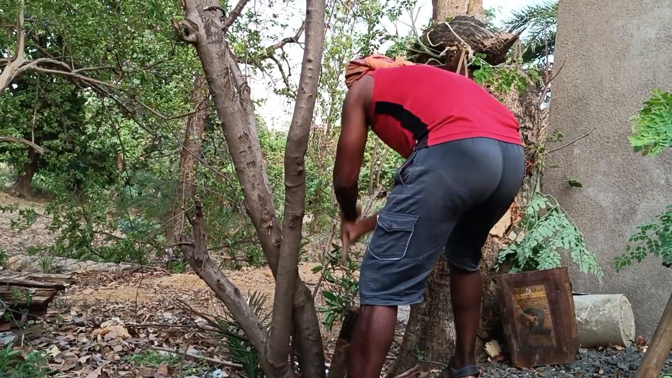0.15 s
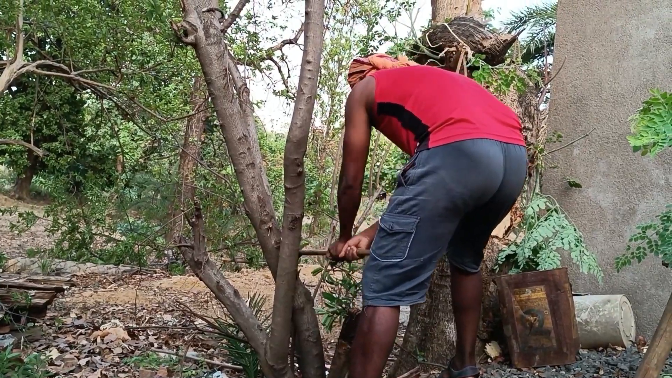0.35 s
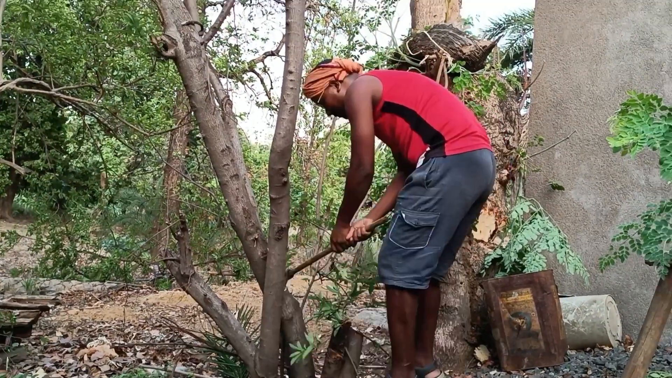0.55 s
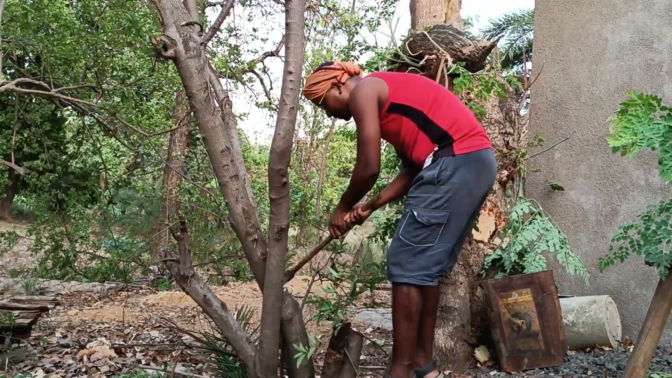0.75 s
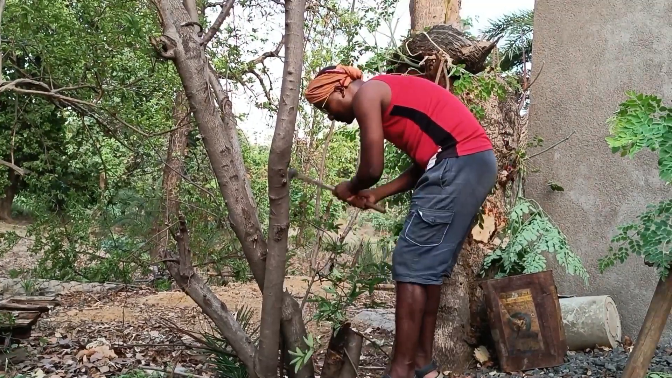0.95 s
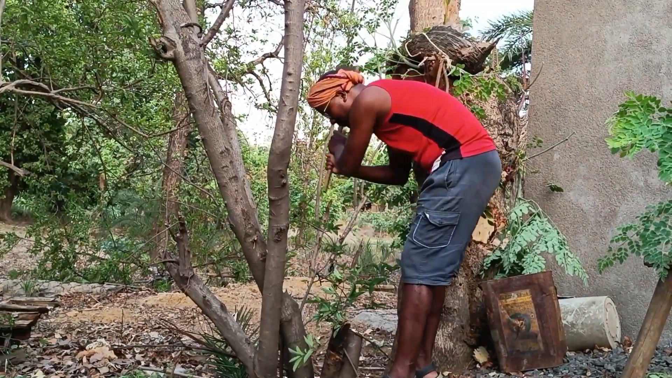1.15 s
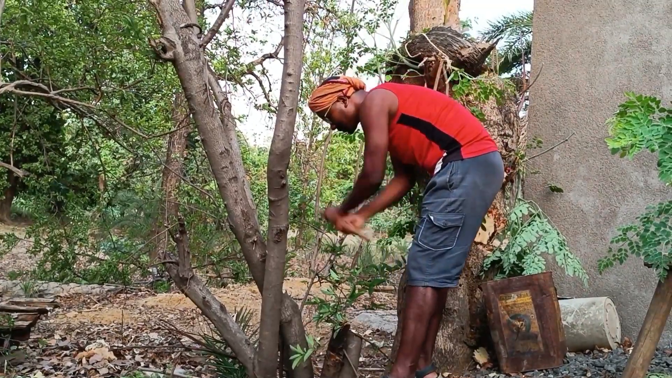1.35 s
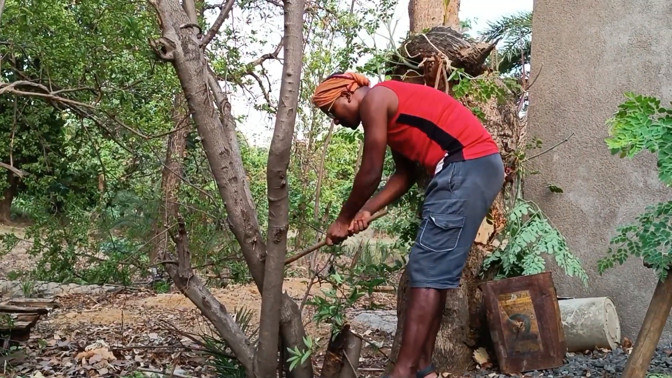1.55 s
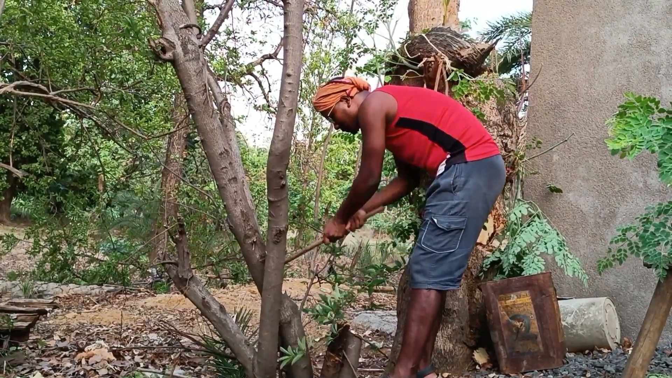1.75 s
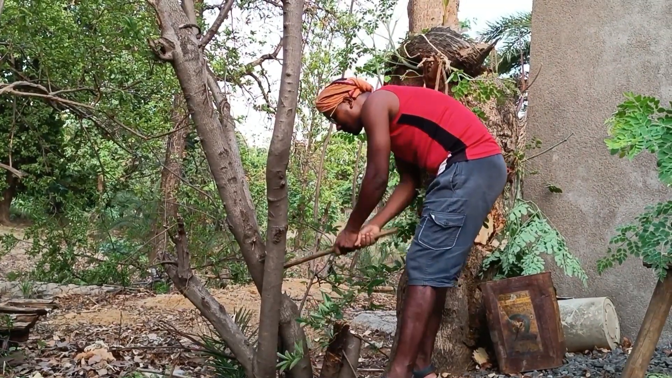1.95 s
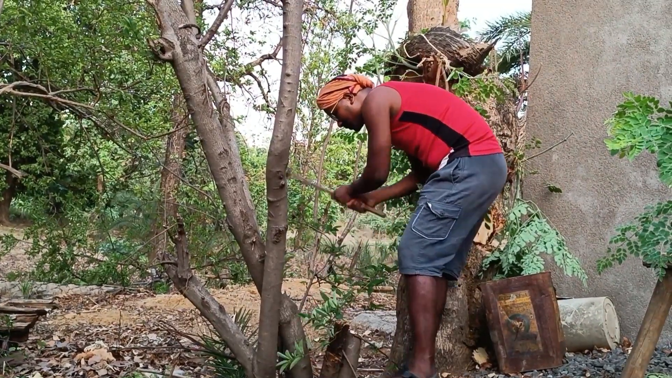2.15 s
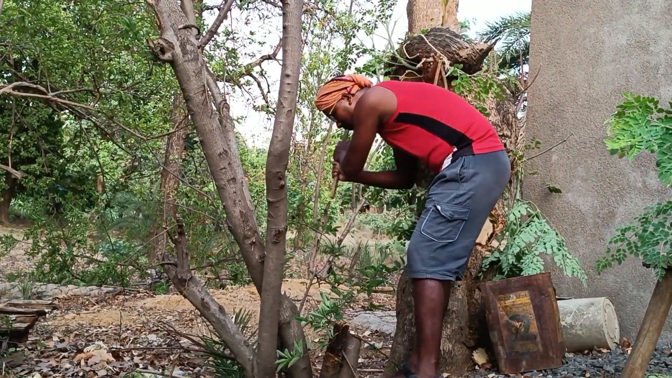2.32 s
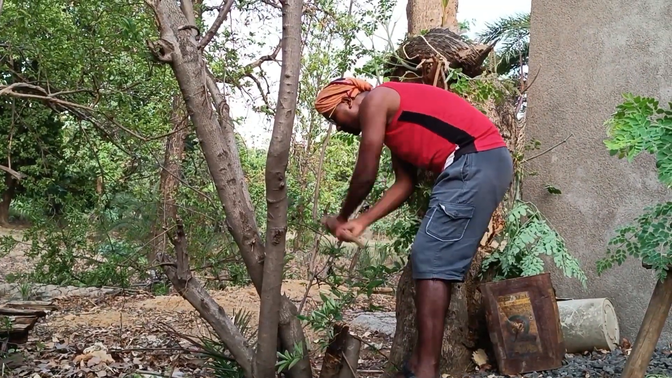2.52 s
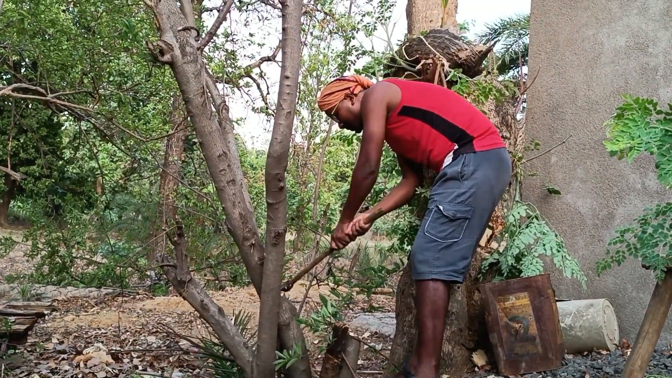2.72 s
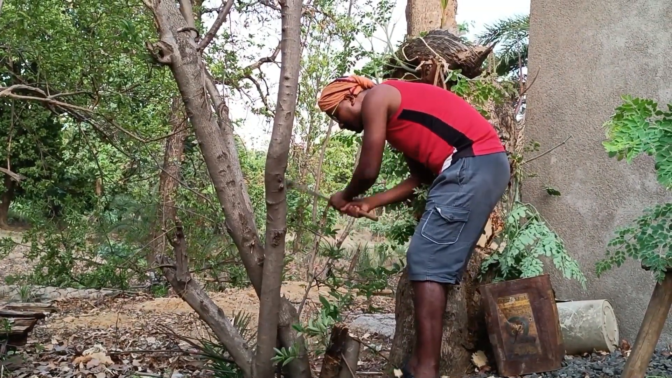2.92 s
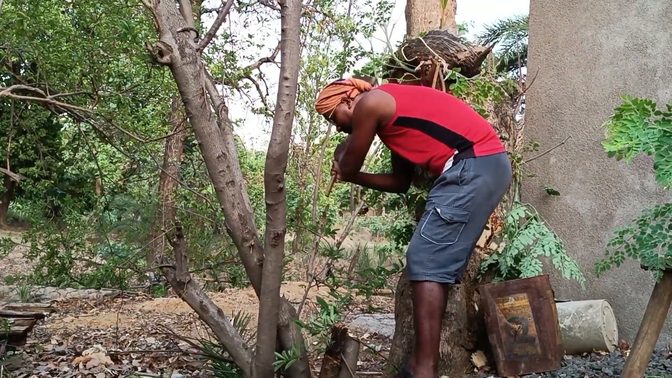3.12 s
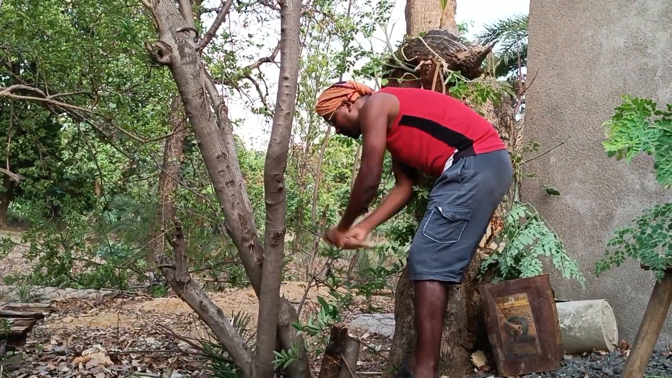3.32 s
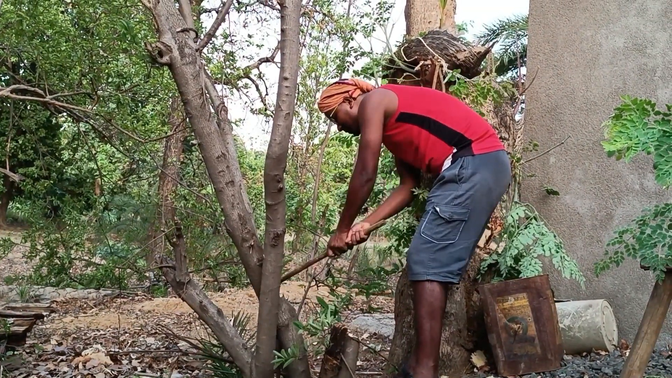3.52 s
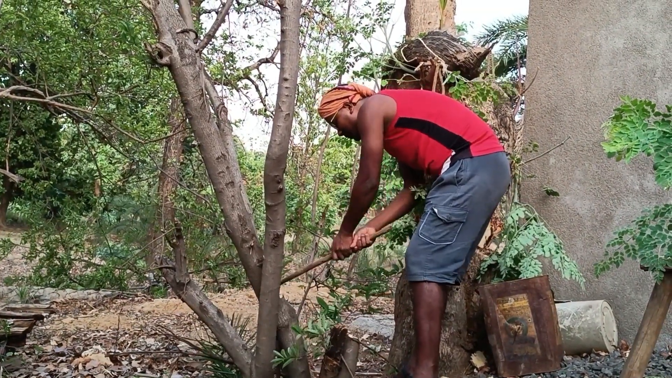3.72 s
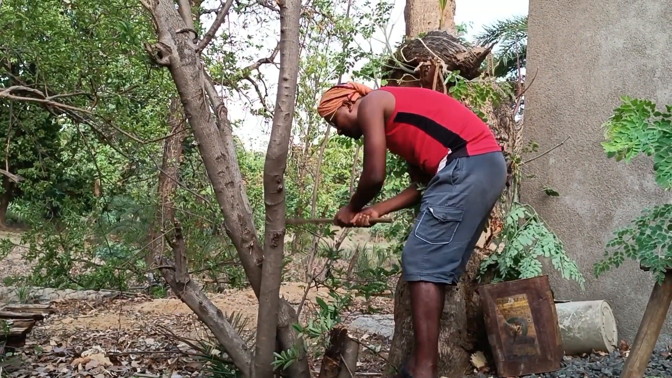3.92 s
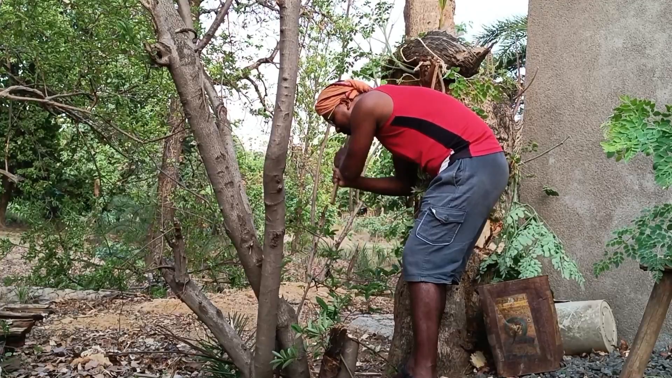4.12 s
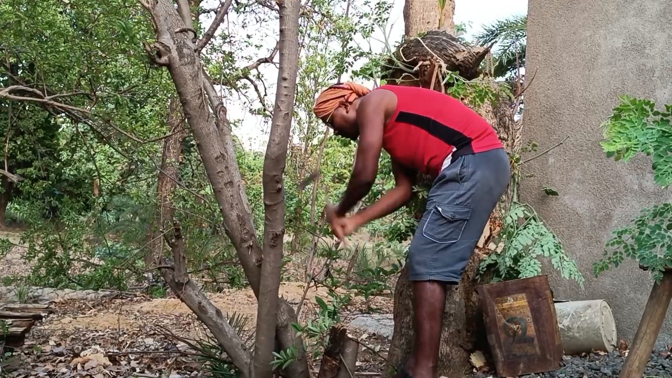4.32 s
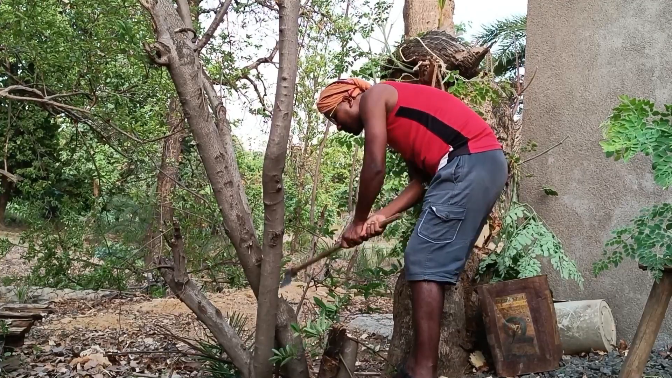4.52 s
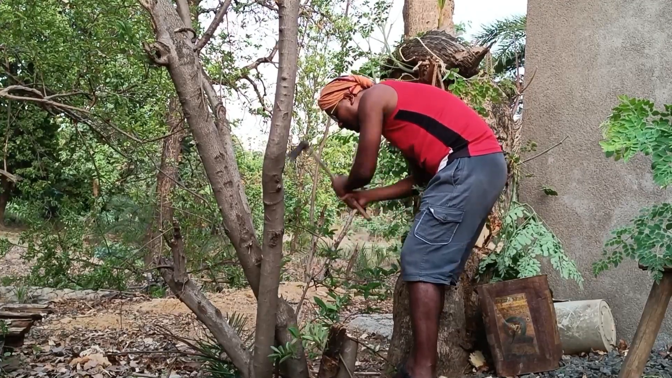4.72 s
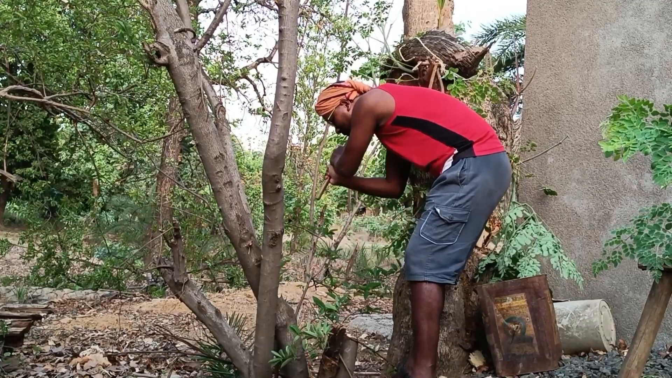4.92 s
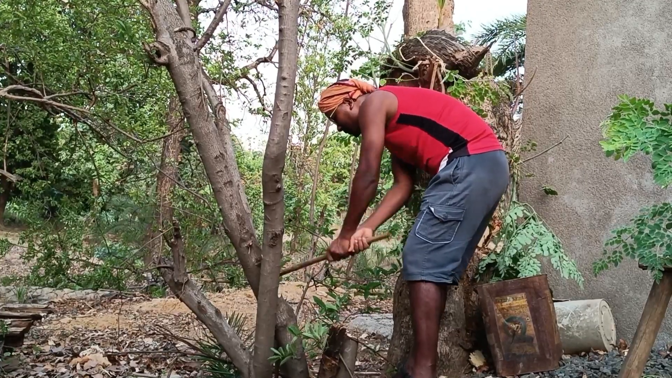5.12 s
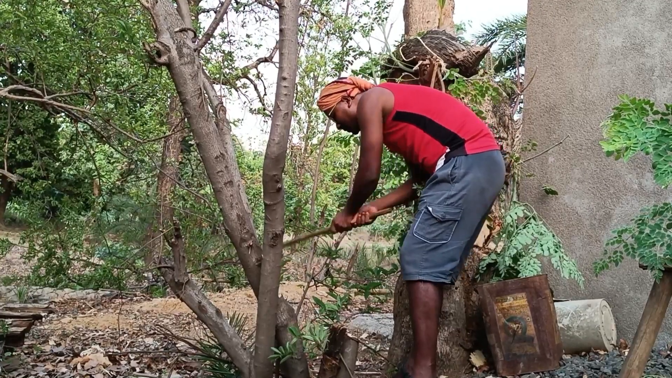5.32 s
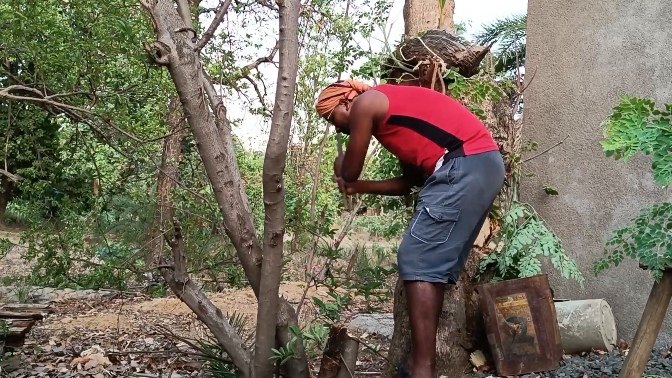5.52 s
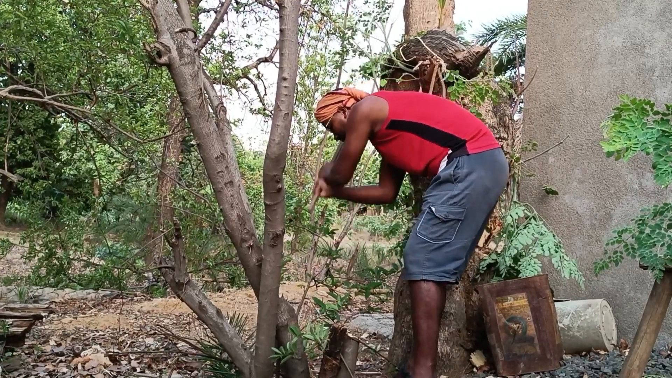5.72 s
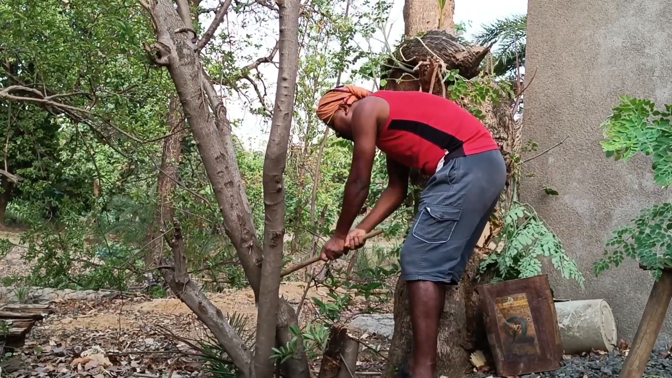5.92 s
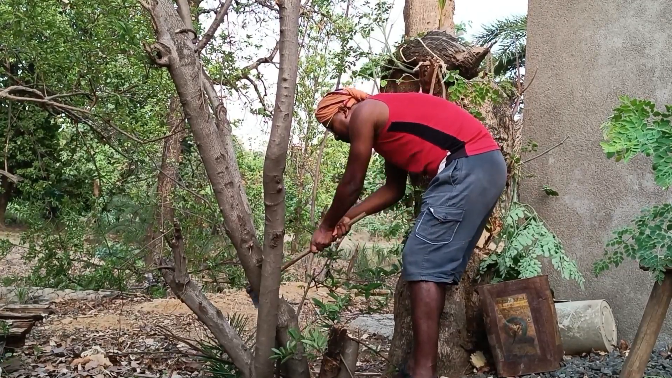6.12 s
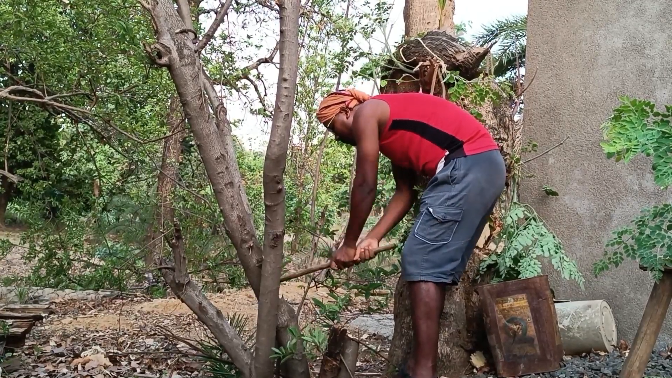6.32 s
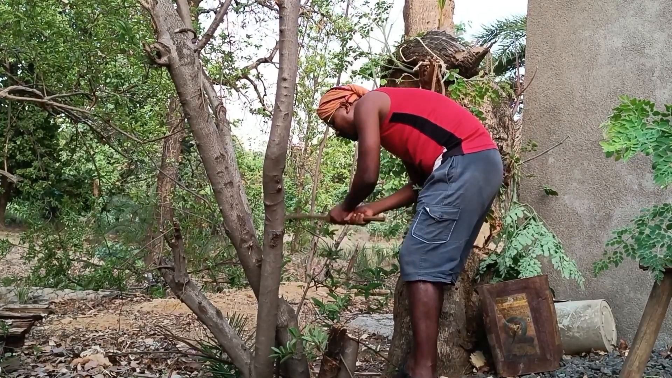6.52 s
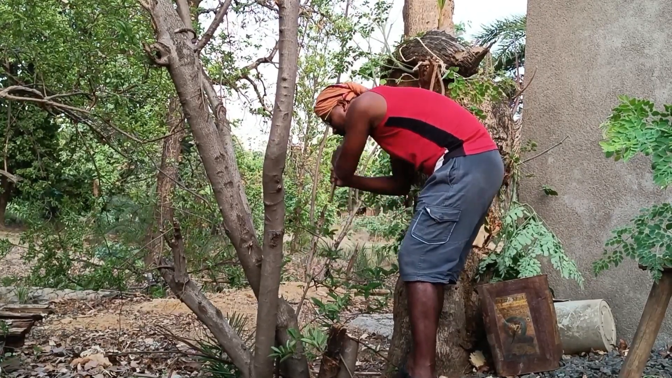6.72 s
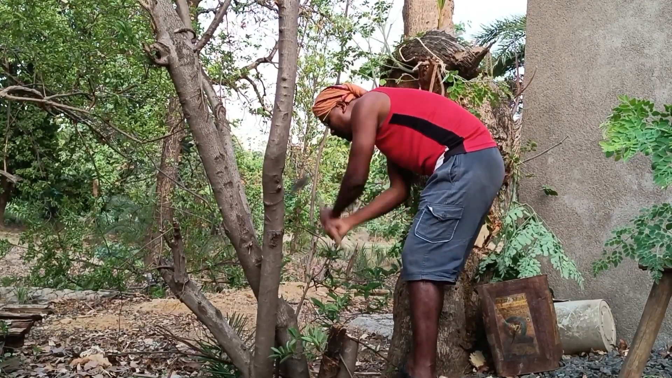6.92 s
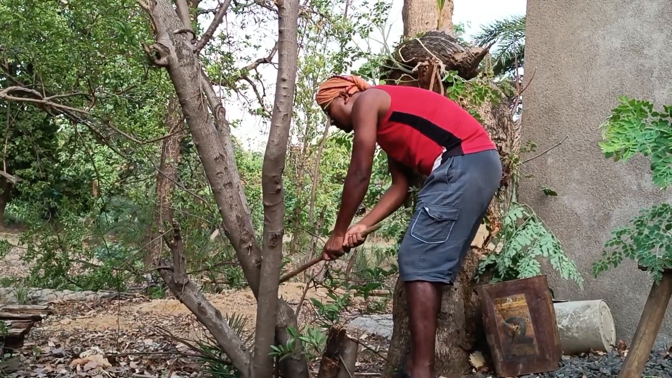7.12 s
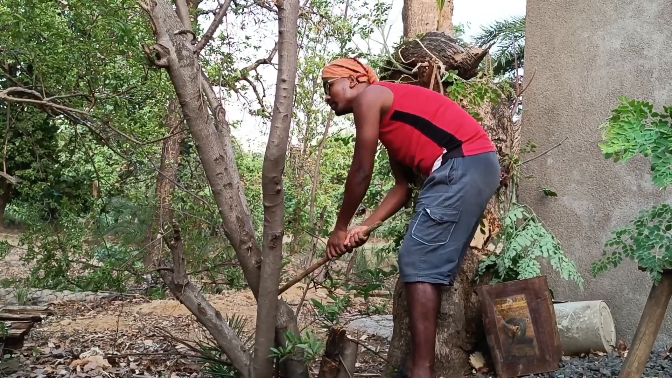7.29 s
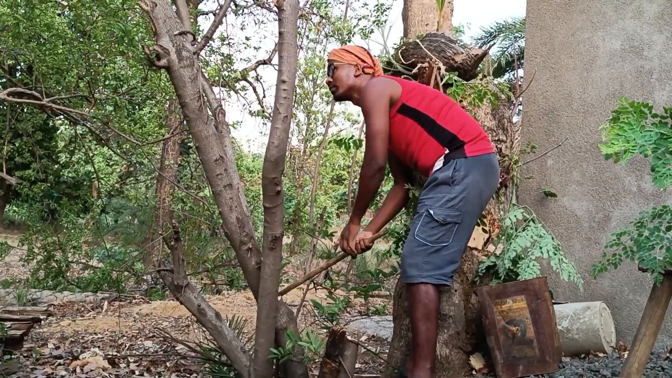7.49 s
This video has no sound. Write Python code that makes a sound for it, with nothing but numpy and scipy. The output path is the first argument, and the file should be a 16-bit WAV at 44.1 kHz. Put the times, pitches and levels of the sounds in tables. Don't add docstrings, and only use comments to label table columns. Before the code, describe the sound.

In a yard beside a house wall, an axe bites a thin trunk eight times, roughly once a second. Each blow is a sharp fibrous crack with a hollow low thump, a short slap off the wall and a shiver of leaves just after. Between blows, leaves rustle, twigs tick and chips knock. Faint high cicada buzz, far birds and traffic hum continue. Close stereo microphone, peaks slightly rounded.

```python
import sys
import numpy as np
from scipy import signal
from scipy.fft import rfft, irfft
from scipy.io import wavfile

SR = 44100
rng = np.random.default_rng(int(sys.argv[2]) if len(sys.argv) > 2 else 0)


def store_pcm(level_fs):
    pcm = np.round(np.clip(level_fs, -1, 1) * 32767).astype(np.int16)
    wavfile.write(sys.argv[1], SR, np.atleast_2d(pcm).T)


def undo_db(level):
    steps = np.asarray(level, float) / 20
    return 10 ** steps


N = 332955
T = np.arange(N) / SR

# start in s, bite length in s, pitch of the crack in Hz, final snap in dB.
BLOWS = [
    (0.387, .014, 3056, 7),
    (1.564, .013, 3060, 10.5),
    (2.7302, .0099, 2916, 17.5),
    (3.5180, .0052, 2750, 19),
    (4.5431, .0064, 2833, 9.5),
    (5.2555, .011, 3146, 11.5),
    (6.0066, .009, 2896, 14.5),
    (7.1465, 0.011, 2797, 16),
]
# thud in dB, crack in dB, splinters in dB, yard echo in dB.
BITES = [
    (-20, -17.5, -30, -8.5),
    (-20.5, -19, -23.5, -11),
    (-17, -21, -28, -9.5),
    (-17, -7, -29, -17.5),
    (-17, -15, -18, -13.5),
    (-17.5, -15.5, -21, -10.5),
    (-17.5, -23, -27.5, -12),
    (-14.5, -20, -30.5, -11),
]
# multiple of the crack pitch, width in Hz.
CRUNCH = [(.32, 445), (.61, 589), (1, 1080), (2.6, 13900)]
# trunk sway in dB, fork in dB, handle in dB, crown in dB, crown t60 in s.
SWINGS = [
    (-20.5, -18, -27, -48.5, 0.7),
    (-22.5, -14, -27.5, -41.5, 0.41),
    (-27.5, -10, -24.5, -41.5, 0.55),
    (-21.5, -14, -17, -43.5, 0.7),
    (-20.5, -17, -26.5, -38.5, 0.42),
    (-23, -31.5, -19, -43.5, .46),
    (-16, -31.5, -25.5, -41, 0.46),
    (-19.5, -16, -19.5, -41.5, 0.54),
]


def rms_one(x):
    return x / np.sqrt(np.mean(x ** 2) + 1e-20)


def at_hz(points, hz):
    table = np.array(points)
    return np.interp(np.log(hz), np.log(table[:, 0]), table[:, 1])


def drift(rate):
    r = np.exp(-80 * np.pi * rate / SR)
    white = rng.standard_normal(N // 40 + 2002)
    slow = signal.lfilter([1], [1, -2 * r, r * r], white)[2000:]
    return np.interp(np.arange(N) / 40, np.arange(len(slow)), rms_one(slow))


def ring(x, hz, t60):
    r = undo_db(-60 / (t60 * SR))
    w = 2 * np.pi * hz / SR
    return signal.lfilter([0, np.sin(w)], [1, -2 * r * np.cos(w), r * r], x + 1e-18)


def resonate(x, hz, width_hz):
    r = np.exp(-np.pi * width_hz / SR)
    zeros = np.array([1, 0, -1]) * (1 - r * r) / 2
    poles = [1, -2 * r * np.cos(2 * np.pi * hz / SR), r * r]
    return signal.lfilter(zeros, poles, x + 1e-18)


def grains(per_s, spread_db, size):
    heights = undo_db(spread_db * np.minimum(rng.exponential(1, size), 5))
    signed = heights * rng.choice([-1, 1], size)
    return rms_one(signed * (rng.random(size) < per_s / SR))


def bands(white, gain, lowest_hz):
    # frequency in Hz, likeness of left and right from -1 to 1.
    likeness = [(60, 0.86), (180, 0.69), (550, 0.36), (1650, 0.0033), (4970, -0.027), (15000, -0.14)]
    out = 0
    edges = 18000 / 2 ** np.arange(0, np.log2(18000 / lowest_hz), .5)
    for k, (high, low) in enumerate(zip(edges, edges[1:])):
        band = signal.butter(2, [low, high], "band", fs=SR, output="sos")
        mid, side = signal.sosfilt(band, white[k % 2])
        hz = np.sqrt(low * high)
        alike = np.clip(at_hz(likeness, hz), -1, 1)
        out = out + gain(hz) * (np.sqrt(1 + alike) * mid + np.sqrt(1 - alike) * side * [[1], [-1]])
    return out


def struck(times, db):
    clicks = np.zeros(N)
    clicks[(np.array(times) * SR).astype(int)] = undo_db(db)
    return clicks


def bite_colours():
    thud_db, crack_db, splinter_db, _ = np.transpose(BITES)
    blade_db = -23.5 + 2.1 * np.maximum(crack_db + 12.5, 0)
    return np.transpose([thud_db, blade_db, crack_db, splinter_db])


def yard():
    # frequency in Hz, level in dB per Hz.
    floor = [(18, -40), (30, -8), (111, 1.5), (178, -6.5), (316, -6), (493, -15), (1520, -16.5),
             (2430, -10.5), (4220, -22), (4930, -10.5), (6410, -26.5), (7300, -16.5), (8770, -22.5),
             (10300, -32), (15600, -20)]
    # frequency in Hz, level in dB per Hz.
    echo = [(35, -40), (60, -16), (230, -4), (460, -8.5), (900, -12.5), (1700, -9), (3200, -11),
            (4500, -12.5), (15500, -22.5)]
    # frequency in Hz, t60 in s.
    echo_t60 = [(60, 0.76), (250, 0.35), (700, 0.22), (2000, 0.19), (3500, 0.1), (6000, .1), (15000, 0.12)]
    white = rng.standard_normal((2, 2, N))
    together = drift(1.5)
    starts = np.array(BLOWS)[:, 0]
    multiples = np.array(CRUNCH)[:, 0]
    colours = bite_colours()

    def gain(hz):
        echo_db = []
        for (_, _, crack_hz, _), (*_, yard_db), colour_db in zip(BLOWS, BITES, colours):
            echo_db.append(yard_db + 0.68 * np.interp(hz / crack_hz, multiples, colour_db))
        decay = undo_db(-60 / (at_hz(echo_t60, hz) * SR))
        dying = signal.lfilter([1], [1, -decay], struck(starts, echo_db) + 1e-18)
        rising = signal.lfilter([.004], [1, -.996], dying)
        air = undo_db(-42.5 + at_hz(floor, hz) + 1.5 * together + 2 * drift(6.2))
        return np.hypot(air, undo_db(20.0 + at_hz(echo, hz) + 2 * drift(58)) * rising)
    return bands(white, gain, 30)


def cicada():
    # frequency in Hz, width in Hz, level in dB.
    tymbal = [(5100, 720, -9), (7300, 540, -8), (7650, 120, -1), (8150, 51, -2.5), (8686, 310, -6)]
    beat_rates = [209.3, 215.0]
    drive = .9 * rng.standard_normal((2, N))
    for pulse_hz in beat_rates:
        cycles = np.cumsum(pulse_hz * (1 + .001 * drift(1.5)) / SR)
        beats = np.diff(np.floor(cycles), prepend=0)
        rattle = grains(2700, 1.7, round(SR / pulse_hz))
        uneven_beats = beats * undo_db(1.5 * rng.standard_normal(N))
        steady = signal.fftconvolve(uneven_beats, rattle)[:N]
        drive += .7 * rms_one(steady) * undo_db(3 * drift(2.5))
    buzz = 0
    for k, (hz, width, db) in enumerate(tymbal):
        buzz = buzz + (-1) ** k * undo_db(db) * resonate(resonate(drive, hz, width), hz, width)
    return rms_one(buzz) * undo_db(-60.5 + 1.4 * drift(44)) * undo_db([[-4.0], [0]])


def birds():
    # start in s, length in s, start pitch in Hz, end pitch in Hz, level in dB.
    whistles = [(.178, .082, 1006, 1026, -71), (.275, .1, 880, 940, -75), (1.085, .06, 2380, 2390, -63.5),
                (1.145, .02, 2780, 2820, -73), (1.2, .035, 2440, 2660, -66), (1.236, .05, 2450, 2780, -65),
                (1.288, .038, 2460, 2320, -64), (1.34, .07, 2100, 2070, -70), (1.422, .03, 2440, 2340, -66),
                (1.432, .079, 1600, 1650, -69), (1.47, .06, 2330, 2450, -69), (3.715, .06, 1130, 1150, -55),
                (6.6, .03, 2150, 2170, -65), (6.79, .05, 2200, 2170, -68), (6.8, .09, 1890, 1810, -71),
                (6.855, .04, 2180, 2130, -65)]
    out = np.zeros(N)
    for s, length, start_hz, end_hz, db in whistles:
        u = np.arange(int(length * SR)) / (length * SR)
        phase = np.cumsum(start_hz + (end_hz - start_hz) * u) * 2 * np.pi / SR
        out[int(s * SR):][:len(u)] += undo_db(db + 6) * np.sin(np.pi * u) * np.sin(phase)
    return out + 0.16 * np.roll(out, round(0.063 * SR)) + .15 * np.roll(out, round(0.029 * SR))


def bite():
    # delay in s, level in dB.
    walls = [(.0075, -15.5), (0.0151, -9.5), (.032, -23.5), (.112, -25), (.121, -27.5)]
    out = np.zeros((2, N))
    age = T[:SR // 5]
    for (s, length, crack_hz, snap_db), colour_db in zip(BLOWS, bite_colours()):
        cracks = grains(7000, 1.7, len(age)) + 0.96 * grains(7000, 0.53, (2, len(age)))
        snap = undo_db(snap_db) * np.eye(1, len(age), round(0.4 * length * SR))
        for k, ((multiple, width), db) in enumerate(zip(CRUNCH, colour_db)):
            u = age / length * 5.37 * multiple ** 0.5
            swell = u ** 2 * np.exp(2 - u) / 4
            hz = multiple * crack_hz
            sound = resonate(resonate(swell * cracks + snap, hz, width), hz, width)
            level = (-1) ** k * undo_db(db - 1.5) * np.sqrt(SR / width / 2)
            out[:, int(s * SR):][:, :len(age)] += level * sound
    dull = signal.lfilter([.2], [1, -.8], out)
    echoes = sum(undo_db(db) * np.roll(dull[::-1], round(delay * SR), axis=1) for delay, db in walls)
    return out + echoes


def trunk():
    # frequency in Hz, level in dB, t60 in s.
    modes = [(64.8, -32.5, 1), (122.65, -19, 0.66), (132.7, -3.5, 0.31), (153.4, -5, 0.22),
             (209.8, -8, 0.3), (235.5, -11, .28), (254, -8, 0.033), (315, -13.5, 0.11), (387.6, -2.5, 0.19),
             (439.2, -1.5, .22), (427, -12, 0.11), (505, -8, 0.1), (562, -18, 0.15), (680, -17, .15),
             (830, -22.5, 0.045), (860, -32, 0.35), (918, -11, 0.18), (1020, -10, 0.073)]
    swing_hz = [135, 220, 350, 430]
    pushes = [s + 0.25 * length for s, length, *_ in BLOWS]
    luck = rng.standard_normal((len(BLOWS), len(modes)))
    out = 0
    for k, (hz, level_db, t60) in enumerate(modes):
        share_db = []
        for sway, fork, handle, *_ in SWINGS:
            gap = -24.5 + 0.16 * (handle + 23)
            share_db.append(np.interp(hz, swing_hz, [sway, fork, gap, handle]))
        clicks = struck(pushes, np.array(share_db) + level_db + 2.6 * luck[:, k]) * (-1) ** k
        late = round(SR * .6 / hz)
        out = out + ring(np.roll(clicks, late), hz, t60)
    return signal.lfilter([.08], [1, -.92], out) * undo_db(6.0)


def rustles():
    # peak time in s, peak level in dB, rise in s, centre in Hz.
    brushes = [(.669, -42.5, .014, 5370), (.68, -45, 0.034, 1080), (.692, -45, 0.025, 5000),
               (.815, -54, .035, 5000), (0.976, -58, 0.015, 6000), (2.031, -62, 0.016, 8250),
               (2.094, -53, .014, 10100), (2.225, -48.5, 0.031, 4740), (2.18, -50, .075, 259),
               (2.365, -40.5, .02, 4280), (2.373, -38, 0.036, 227), (2.424, -51.5, 0.021, 4330),
               (2.546, -48.5, 0.012, 2680), (2.55, -51, .025, 229), (2.689, -59, 0.0092, 12100),
               (5.022, -50, .014, 6010), (5.7, -56, .01, 4060), (5.95, -63.5, .02, 12000),
               (6.508, -59.5, 0.012, 5030), (6.631, -60.5, .013, 11970)]
    # peak time in s, peak level in dB, fall in s, centre in Hz.
    ticks = [(.785, -56.5, .01, 3000), (.896, -51, .018, 3416), (3.239, -54, .005, 4120),
             (3.279, -60, .008, 13670), (3.436, -51.5, .003, 10420), (4.224, -58, .008, 14170),
             (4.33, -62, .005, 5900), (4.377, -50, .013, 4770), (5.002, -49, .014, 5650),
             (5.147, -44, .018, 4380), (5.77, -60, .01, 13860), (5.795, -38.5, .013, 750),
             (5.815, -51, .012, 3480), (5.924, -51, 0.0035, 6990), (5.977, -48, .007, 2200),
             (5.996, -50, .004, 5110), (6.956, -46, .012, 713), (7.099, -51, .009, 8000)]
    swells = [(s, db, rise, 0.52 * rise, hz) for s, db, rise, hz in brushes]
    return swells + [(s, db, .0008, fall, hz) for s, db, fall, hz in ticks]


def leaves():
    # frequency in Hz, level in dB per Hz.
    crown = [(300, -14), (600, -7.5), (1100, -4), (1900, -2), (3300, -1.5), (5000, -6.5), (7000, -3),
             (10000, -9.5), (15000, -5.5)]
    # centre in Hz, dB lost per octave squared.
    narrow = [(250, 12), (750, 27.5), (2500, 8.5), (5000, 3.5), (12000, 4.5)]
    shake = np.zeros(N)
    for (s, *_), (*_, leaf_db, t60) in zip(BLOWS, SWINGS):
        age = np.maximum(T - s - .012, 0)
        decay = np.hypot(undo_db(-60 * age / t60), undo_db(-21 - 60 * age / 1.23))
        arrival = 1 - np.exp(-(age / 0.061) ** 2)
        shake += undo_db(leaf_db) * decay * arrival * 4.14
    shake *= undo_db(0.5 * drift(36))

    def gain(hz):
        power = (shake * undo_db(at_hz(crown, hz) + 9.5)) ** 2
        for s, peak_db, rise, fall, centre_hz in rustles():
            near = slice(int((s - 6 * rise) * SR), int((s + 8 * fall) * SR))
            swell = np.exp(np.minimum((T[near] - s) / rise, (s - T[near]) / fall))
            loss_db = at_hz(narrow, centre_hz) * np.log2(hz / centre_hz) ** 2
            power[near] += (swell * undo_db(peak_db + 7.5 - loss_db)) ** 2
        return np.sqrt(power) * undo_db(1.1 * drift(33) + 0.93 * drift(8.9))
    return bands(grains(5000, 3, (2, 2, N)), gain, 150)


def knocks():
    # start in s, peak in dB, pitch in Hz, t60 in s.
    taps = [
        (1.077, -34, 996, 0.032),
        (1.098, -40.5, 345, 0.029),
        (1.195, -54, 980, 0.031),
        (3.631, -33.5, 150.2, 0.39),
        (3.64, -36, 403, 0.18),
        (5.795, -47.5, 395, 0.13),
        (6.673, -40.5, 590, 0.045),
        (6.675, -38.5, 784, 0.021),
        (6.954, -52.5, 395, 0.069),
        (7.102, -54.5, 1000, 0.082),
    ]
    out = np.zeros(N)
    for s, peak_db, hz, t60 in taps:
        click = np.eye(1, SR // 5)[0] * undo_db(peak_db)
        tap = ring(click, hz, t60) + 0.35 * ring(click, 1.52 * hz, 0.25 * t60)
        out[int(s * SR):][:len(click)] += tap
    return out


def scene():
    background = yard() + cicada() + birds() * undo_db([[-2.5], [1.5]])
    blows = bite() + trunk() * undo_db([[-.7], [.7]])
    return background + blows + leaves() + knocks()


def low_pass(x):
    return signal.sosfilt(signal.butter(12, 16820, fs=SR, output="sos"), x)


def record(dry):
    # frequency in Hz, left minus right in dB.
    ports = [(300, 0), (1300, 0), (2400, -4.5), (4400, -3.5), (6500, -12.5), (8500, -8.5), (10000, 2.5),
             (15000, -2)]
    hz = np.maximum(np.fft.rfftfreq(N, 1 / SR), 1)
    tilt_db = at_hz(ports, hz) / 2
    edges = np.where(hz < 15500, 1, undo_db(-41)) / np.sqrt(1 + (58 / hz) ** 5)
    rounded = 1.306 * np.tanh(dry / 1.372)
    mix = irfft(rfft(rounded) * undo_db([tilt_db, -tilt_db]) * edges, N)
    return low_pass(mix)


dry = scene()
out = record(dry)
store_pcm(out)
```